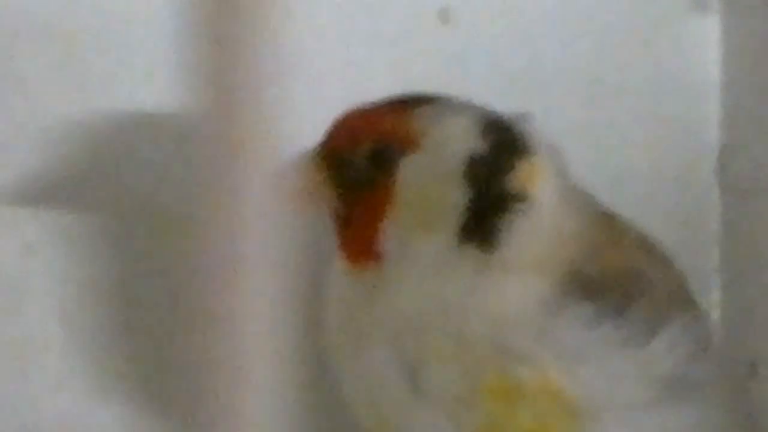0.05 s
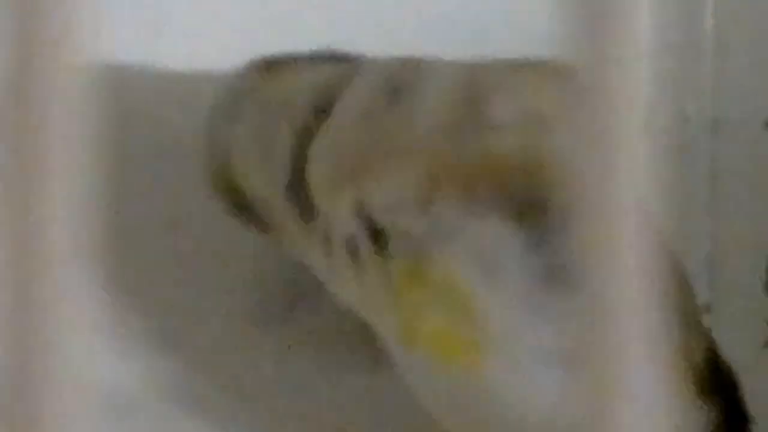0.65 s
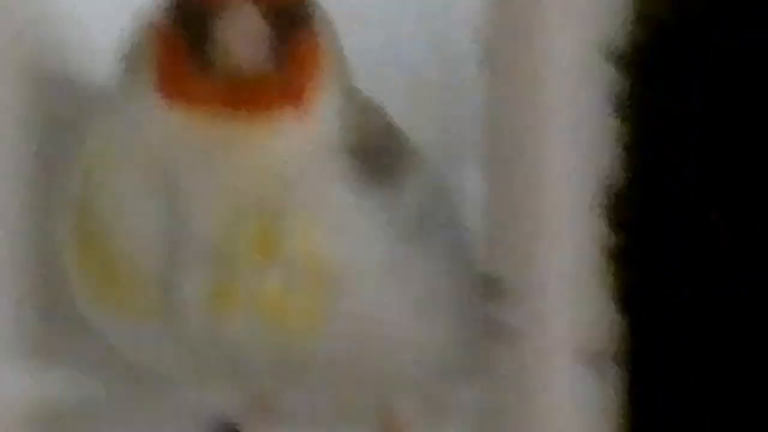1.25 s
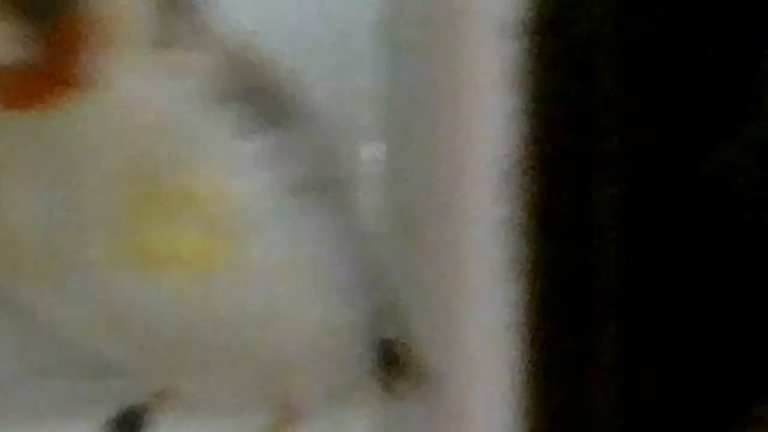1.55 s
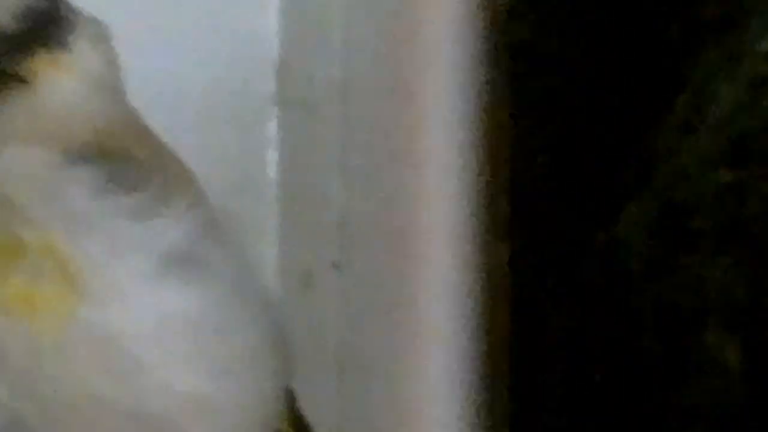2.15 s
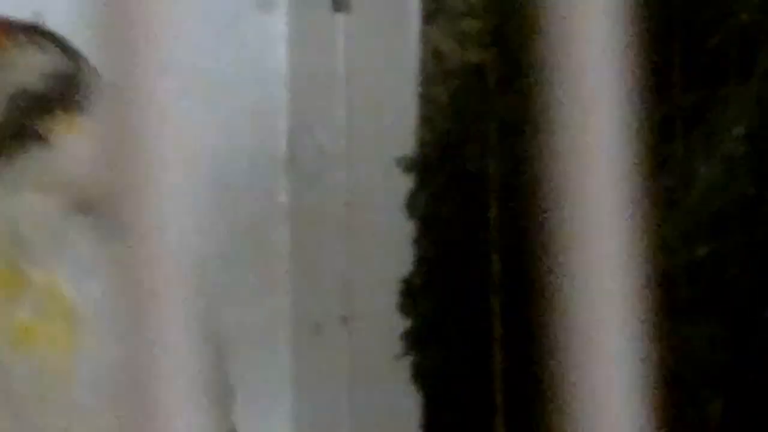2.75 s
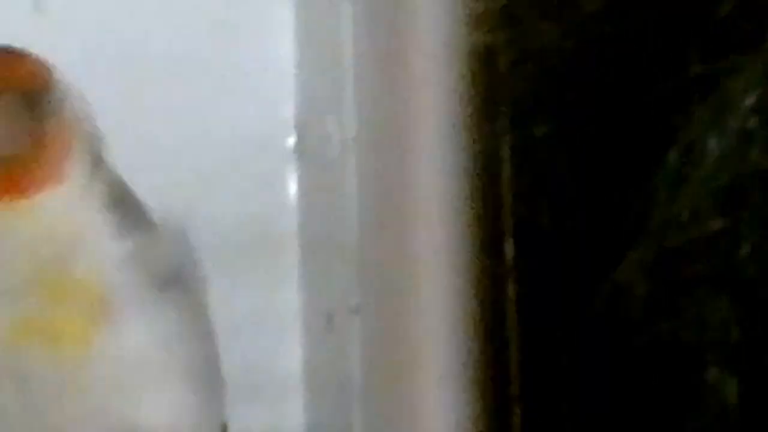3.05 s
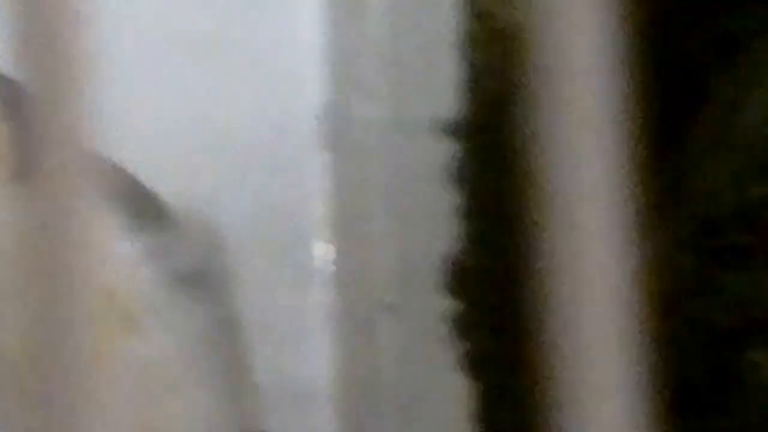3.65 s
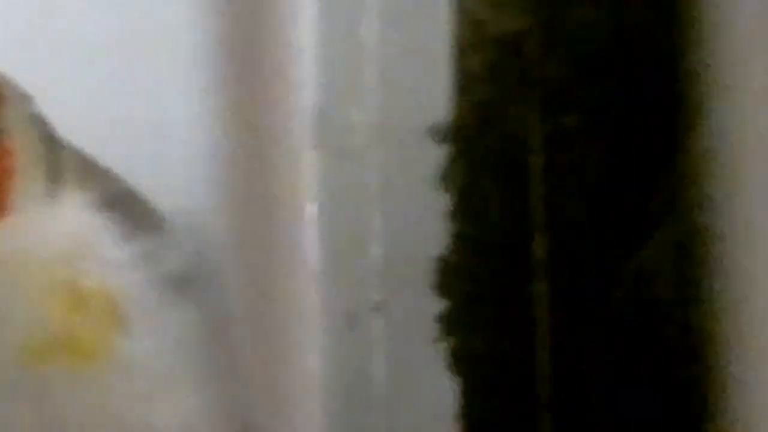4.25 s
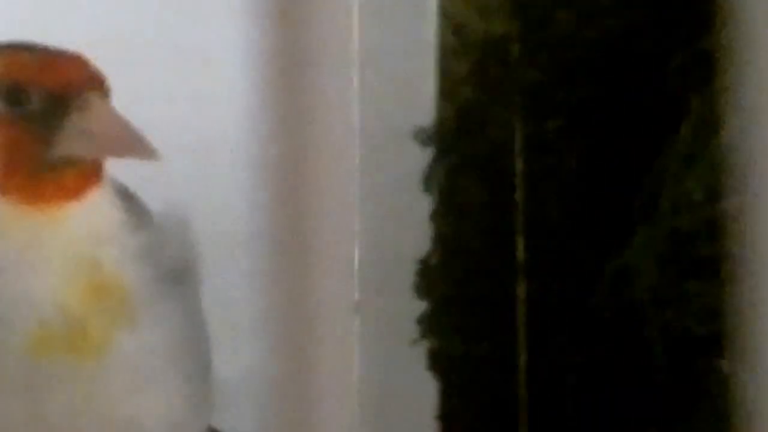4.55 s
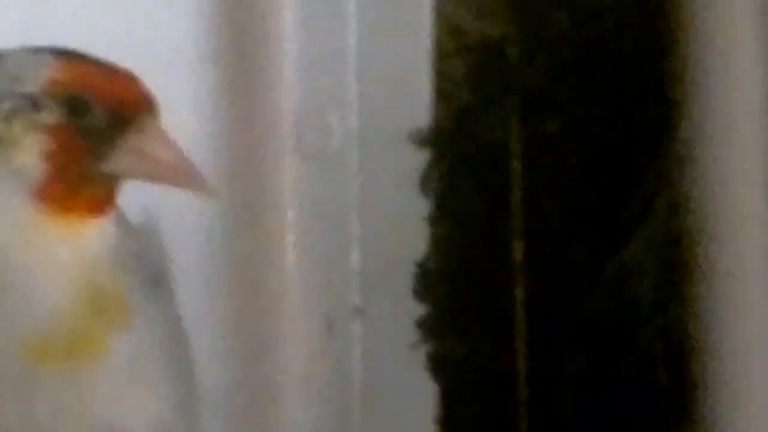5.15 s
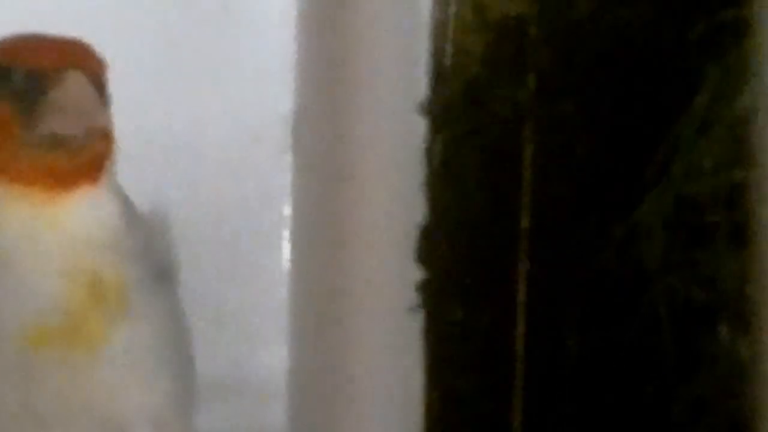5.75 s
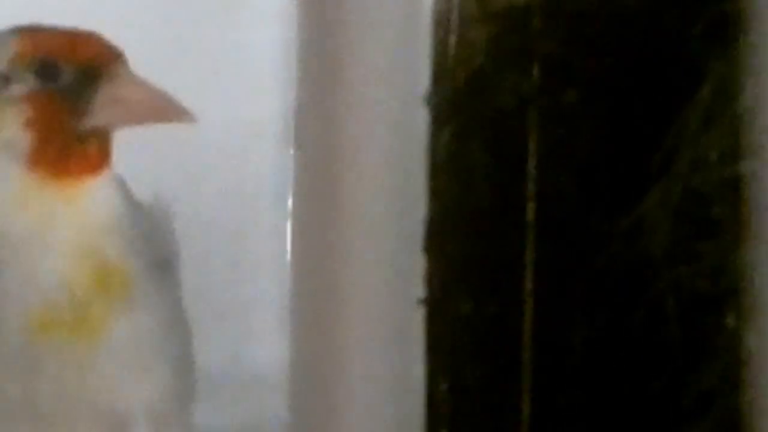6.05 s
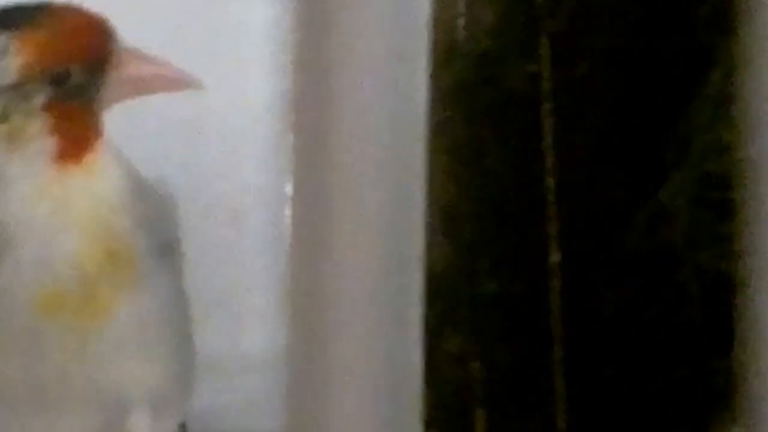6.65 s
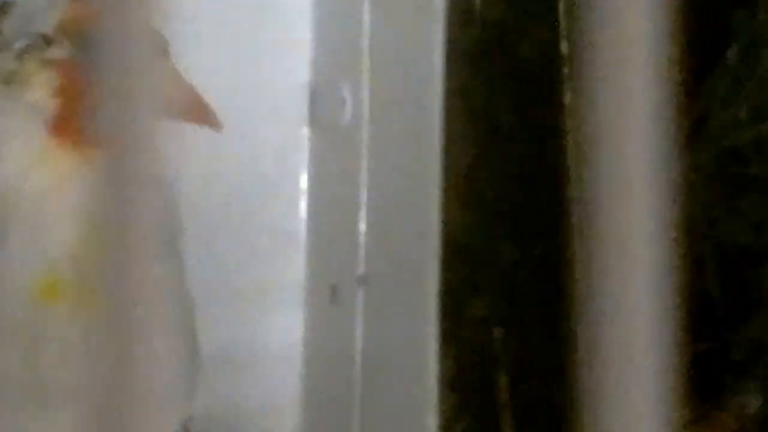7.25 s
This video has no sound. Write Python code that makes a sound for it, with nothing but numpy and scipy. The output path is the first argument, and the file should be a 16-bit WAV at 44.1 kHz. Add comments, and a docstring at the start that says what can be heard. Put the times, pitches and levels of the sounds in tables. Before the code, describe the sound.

In a small room, a motor hums steadily while a caged goldfinch twitters nearby. Its first long phrase mixes thin whistles, rasping notes and a fast trill, with one light knock on the perch. The bird pauses, then gives a shorter, softer phrase among faint cage scuffs and ends on a squeaky chirp. The close notes ring briefly off the hard walls.

```python
"""Caged goldfinch in a small room

A goldfinch twitters near the microphone: buzzed syllables, a trill, even runs of whistles.
Each note is a quick glide of the syrinx, pure or rasping, drawn out by hard walls and cage wires.
A motor hums behind it; the cage knocks once and now and then scuffs faintly. Almost mono."""
import sys
import numpy as np
from scipy import signal
from scipy.fft import rfft, irfft
from scipy.io import wavfile

SR = 44100
rng = np.random.default_rng(int(sys.argv[2]) if len(sys.argv) > 2 else 0)


def to_wav(sig):
    """Store sig (one row per channel, or 1-D mono) as 16-bit WAV at the path in sys.argv[1].

    Samples outside -1..1 are clipped; the rate is SR.
    """
    pcm = np.clip(np.atleast_2d(sig), -1, 1) * 32767
    pcm = np.round(pcm).astype(np.int16)
    wavfile.write(sys.argv[1], SR, pcm.T)  # frames by channels


N = 326340
TIME = np.arange(N) / SR

# falling whistles that stand out of the runs: start_s, length_s, pitch_hz, level_db
ACCENTS = [(0.263, 0.022, 4716, -22), (0.326, .022, 4670, -20), (3.106, 0.019, 4853, -16),
           (3.379, .02, 4740, -23), (6.366, .021, 4550, -22.5), (6.392, .024, 4520, -26)]
# repeats of the trill's four-note figure: start_s, clear_note_hz
TRILL = [(1.627, 3996), (1.815, 4070), (1.994, 4155), (2.184, 4110), (2.368, 4100), (2.556, 4090)]


def amp(db):
    return 10 ** (np.asarray(db) / 20)


def unit(x):
    return x / np.sqrt(np.mean(x ** 2) + 1e-20)


def read(points, hz):
    """Table value at hz, interpolated on a log axis."""
    freq_hz, value = np.transpose(points)
    return np.interp(np.log(hz + 1), np.log(freq_hz + 1), value)


def add(mix, start_s, sound):
    part = mix[max(round(start_s * SR), 0):][:len(sound)]
    part += sound[:len(part)]


def noise(spectrum):
    """Unit-rms noise shaped by rows of freq_hz, gain_db."""
    gain = amp(read(spectrum, np.fft.rfftfreq(N, 1 / SR)))
    return unit(irfft(rfft(rng.standard_normal(N)) * gain, N))


def wander(rate_hz):
    """Unit-rms random curve, low-passed at rate_hz."""
    lowpass = signal.butter(3, rate_hz, fs=SR, output="sos")
    return unit(signal.sosfilt(lowpass, rng.standard_normal(N + SR))[SR:])


def room(x, gap_s=.003, taps_per_s=4000):
    """Dense wall reflections of random sign; the treble dies first."""
    # echo decay: freq_hz, t60_s
    decay = [(200, .35), (3000, .36), (4700, .34), (5800, .28), (6600, .28), (8000, .22), (13000, .18)]
    taps = rng.choice([-1., 1.], SR) * (rng.random(SR) < taps_per_s / SR) * (TIME[:SR] > gap_s)
    hz, t, bands = signal.stft(taps, SR, nperseg=256)
    tail = signal.istft(bands * amp(-60 * t / read(decay, hz)[:, None]), SR, nperseg=256)[1]
    return signal.fftconvolve(x, tail / np.linalg.norm(tail))[:N]


def motor(turn_hz=23.44, drift=.005, waver=.25):
    """Hum at set ratios of a drifting turn rate, mostly whole multiples, each wavering in level."""
    # motor orders: ratio_to_turn_rate, level_db
    orders = [(2, -48.5), (3, -47.5), (4, -52), (5.2, -48), (7, -48.5), (9, -50), (15, -57.5)]
    turn = 2 * np.pi * np.cumsum(turn_hz * (1 + drift * wander(2.6))) / SR
    hum = np.zeros(N)
    for multiple, db in orders:
        peak = amp(db) * np.sqrt(2) * (1 + waver * wander(6.6))
        hum += peak * np.sin(multiple * turn + 2 * np.pi * rng.random())
    return hum


def air(swell_s=2.05, swell_width_s=.37, whirr_half_width_hz=70, floor_db=-41):
    """Rumble and rushing air that swell once, a narrow whirr and a steady noise floor."""
    # noise floor: freq_hz, gain_db
    floor_spectrum = [(20, -20), (32, -21.5), (50, 2), (140, -1), (210, -3), (250, -8), (420, -10),
                      (650, -17), (950, -25), (1400, -20), (1750, -33), (2300, -38.5), (3200, -47.5),
                      (7000, -58.5), (15000, -62.5)]
    # course of the whirr: time_s, level_db, centre_hz
    whirr_track = [(0.7, -51.5, 1372), (2.02, -53, 1390), (7.0, -58, 1322)]
    swell = np.exp(-((TIME - swell_s) / swell_width_s) ** 2)
    rumble = noise([(30, -37), (90, -10), (145, 0), (200, -8), (270, -31.5), (1000, -72)])
    rush = noise([(200, -24), (370, -1.5), (600, -10), (950, -19.5), (1400, -13), (1800, -30.5),
                  (6000, -70)])
    swelling = amp(-47 + 12 * swell) * rumble + amp(-54 + 7.5 * swell) * rush
    time_s, *columns = np.transpose(whirr_track)
    whirr_db, whirr_hz = (np.interp(TIME, time_s, column) for column in columns)
    baseband = wander(whirr_half_width_hz) + 1j * wander(whirr_half_width_hz)
    whirr = unit((baseband * np.exp(2j * np.pi * np.cumsum(whirr_hz) / SR)).real)
    return swelling + amp(whirr_db) * whirr + amp(floor_db) * noise(floor_spectrum)


def stroke(start_s, length_s):
    """Quick rise and slower fall of a contact."""
    u = np.maximum(TIME - start_s, 0) / (length_s / 2)
    return u * np.exp(1 - u)


def knock(level_db=-21, rise_s=.00059):
    """One impact rings the perch."""
    # perch modes: freq_hz, gain_db, t60_s
    modes = [(645, 6.5, 0.014), (1052, -13, 0.031), (1185, -6, 0.033), (2020, -15.5, 0.017)]
    t = TIME[:SR // 4]
    ring = sum(amp(db - 60 * t / t60) * np.sin(2 * np.pi * hz * t) for hz, db, t60 in modes)
    return amp(level_db) * ring * (1 - np.exp(-t / rise_s))


def cage(grain=.19, scuff_fizz_db=-24.5, knock_s=2.594, echo_db=-9):
    """Grainy scuffs with a soft thud, brief high rustles, one knock with a sharp click; their echo."""
    # scuffs on the cage: start_s, length_s, scratch_db, thud_db
    scuffs = [(1.141, 0.019, -43.5, -58), (4.811, 0.015, -54.5, -61), (4.842, .037, -55.5, -58.5),
              (5.16, 0.049, -51.5, -38.5), (5.621, .083, -49, -36), (5.757, 0.03, -47, -48.5),
              (6.715, .016, -54.5, -43), (7.265, 0.034, -47, -33.5)]
    # two brief high rustles, then the sharp click of the knock: start_s, length_s, fizz_db
    fizz_bursts = [(.815, .032, -55), (1.315, 0.037, -55), (2.591, 0.0045, -52)]
    # contact spectra: freq_hz, gain_db
    scratch_spectrum = [(300, -5.5), (1100, 4.5), (2200, 2.5), (4000, -3.5), (7000, -18), (16000, -43.5)]
    thud_spectrum = [(30, -5), (70, -2), (200, -2), (450, -3.5), (800, -14.5), (2000, -46), (16000, -85)]
    fizz_spectrum = [(2000, -45.5), (7000, 3.5), (13000, -5), (16000, -9.5)]
    grains = np.exp(grain * wander(150))
    scratch = unit(noise(scratch_spectrum) * grains)
    thud = noise(thud_spectrum)
    fizz = unit(noise(fizz_spectrum) * grains)
    scratch += amp(scuff_fizz_db) * fizz
    out = np.zeros(N)
    for start_s, length_s, scratch_db, thud_db in scuffs:
        out += stroke(start_s, length_s) * (amp(scratch_db) * scratch + amp(thud_db) * thud)
    for start_s, length_s, fizz_db in fizz_bursts:
        out += stroke(start_s, length_s) * amp(fizz_db) * fizz
    add(out, knock_s, knock())
    return out + amp(echo_db) * room(out)


def wires(x):
    """Thin cage wires ring on after each note."""
    # wire modes: freq_hz, gain_db, t60_s
    modes = [(4090, -9, .25), (4570, -10, .2), (5020, -1, .28), (5230, -4, .28), (5440, -4, .25)]
    t = TIME[:SR // 2]
    ring = np.zeros(len(t))
    for hz, db, t60 in modes:
        resonant_gain = t60 * SR / (2 * np.log(1000))
        ring += amp(db - 60 * t / t60) * np.cos(2 * np.pi * hz * t) / resonant_gain
    return signal.fftconvolve(x, ring)[:N]


def syrinx(notes, glide, rasp, overtone_db, third_db=-14, sag=0, regular=.17, shimmer=.89):
    """Notes (start_s, length_s, pitch_hz, level_db) glide between two pitch ratios; flutter rasps."""
    # radiation of throat and beak: freq_hz, gain_db
    throat = [(2000, 9.5), (3000, 2), (4200, 0), (6700, 5), (7600, -13), (9200, -18), (10500, -13),
              (12800, -13), (14200, -20), (16000, -35.5)]
    flutter_hz, attack_s, release_s = 470, .011, .013
    beat = np.sin(2 * np.pi * np.cumsum(flutter_hz * (1 + .15 * wander(60))) / SR)
    flutter = unit(regular * beat + wander(680))
    throb = np.exp(shimmer * rasp * unit(beat + wander(300)))
    contour = np.polyfit([0, .5, 1], [glide[0], 1, glide[1]], 2)
    out = np.zeros(N)
    for start_s, length_s, pitch_hz, db in notes:
        u = np.linspace(0, 1, int(length_s * SR))
        span = (int(start_s * SR) + np.arange(len(u))) % N
        hz = pitch_hz * np.polyval(contour, u)
        hz *= 1 - sag * (2 * u - 1) ** 10  # low air pressure at both ends
        phase = 2 * np.pi * np.cumsum(hz * (1 + rasp * flutter[span])) / SR
        tone = np.sin(phase)
        for k, partial_db in [(2, overtone_db), (3, overtone_db + third_db)]:
            radiated_db = read(throat, k * hz) - read(throat, hz)
            tone += amp(partial_db + radiated_db) * np.sin(k * phase) * (k * hz < SR / 2)
        ramp = np.minimum(u * length_s / attack_s, (1 - u) * length_s / release_s)
        envelope = np.sin(np.pi / 2 * np.minimum(ramp, 1)) ** 2
        add(out, start_s, amp(db) * unit(tone * envelope * throb[span]))
    return out


def buzz_notes(step_s=.021, buzz_delay_s=.026, tone_s=.044, sideband_hz=470):
    """A thin note steps in pitch, then a harsh buzz settles into a tone; flutter adds a sideband."""
    # syllables: start_s, first_hz, second_hz, thin_db, buzz_s, buzz_hz, buzz_db, tone_hz, tone_db
    syllables = [(.636, 6440, 6400, -28.5, 0.049, 4110, -25, 5030, -30.5),
                 (.848, 6253, 6560, -22, 0.058, 4450, -22, 4550, -25),
                 (1.057, 6540, 6240, -24, 0.054, 4690, -22, 5060, -27.5),
                 (1.251, 6480, 6190, -24, 0.092, 4660, -27, 4580, -24.5),
                 (1.508, 6344, 6250, -25, 0.061, 4285, -29, 4570, -28),
                 (5.288, 6270, 6240, -33, 0.039, 4160, -35.5, 4980, -33.5),
                 (5.484, 6543, 6480, -28.5, .03, 4205, -31.5, 4967, -30.5),
                 (5.668, 6410, 6450, -28.5, .044, 4500, -35, 4930, -36)]
    thin, harsh, tones = [], [], []
    for start_s, first_hz, second_hz, thin_db, buzz_s, buzz_hz, buzz_db, tone_hz, tone_db in syllables:
        thin.append((start_s, .032, first_hz, thin_db))
        thin.append((start_s + step_s, .045, second_hz, thin_db - 2.5))
        harsh.append((start_s + buzz_delay_s, buzz_s, buzz_hz, buzz_db))
        settled_s = start_s + buzz_delay_s + buzz_s / 2
        tones.append((settled_s, tone_s, tone_hz, tone_db))
        tones.append((settled_s, tone_s, tone_hz + sideband_hz, tone_db - 5.5))
    return thin, harsh, tones


def trill_notes(delay_s, length_s, hz, db, step_db, scatter=.008):
    """One note of the trill figure at every repeat, its pitch slightly scattered."""
    return [(start_s + delay_s, length_s, hz * (1 + scatter * rng.standard_normal()), db + k * step_db)
            for k, (start_s, _) in enumerate(TRILL)]


def slur_notes(lead_s=.029, pip_s=.022, pip_hz=3060, clear_s=.036):
    """A low pip, then a clear note: between the buzzes and in the trill."""
    # slurs between buzzes: start_s, pitch_hz, level_db, pip_db
    slurs = [(.779, 4005, -22, -33.5), (0.988, 4063, -20.5, -36), (1.195, 3970, -23.5, -34.5),
             (1.433, 4045, -22.5, -34), (5.413, 4123, -27.5, -53.5), (5.605, 4207, -23.5, -52.5)]
    # trill pip: delay_s, length_s, pitch_hz, level_db, step_db per repeat
    trill_pip = (0, 0.02, 3055, -33, .6)
    # trill clear note: delay_s, length_s, level_db, step_db per repeat
    trill_clear = (.033, 0.0673, -27.5, -0.46)
    low = [(s - lead_s, pip_s, pip_hz, pip_db) for s, _, _, pip_db in slurs] + trill_notes(*trill_pip)
    clear = [(s, clear_s, hz, db) for s, hz, db, _ in slurs]
    delay_s, length_s, level_db, step_db = trill_clear
    clear += [(s + delay_s, length_s, hz, level_db + k * step_db) for k, (s, hz) in enumerate(TRILL)]
    return low, clear


def run_notes(note_s=.033, dip_hz=169.6, scatter_hz=35, fade_db_per_s=12):
    """Evenly paced whistles that dip mid-run and fade, leaving gaps for the accents."""
    # whistle runs: start_s, end_s, period_s, pitch_hz, level_db
    runs = [(0.225, .48, .056, 4790, -25), (3.036, 3.4, .0655, 4815, -21.5),
            (6.014, 6.29, .0615, 4765, -23.5)]
    notes = []
    for start_s, end_s, period_s, pitch_hz, db in runs:
        for t in np.arange(0, end_s - start_s, period_s):
            hz = pitch_hz - dip_hz * np.sin(np.pi * t / (end_s - start_s)) ** 2
            hz += scatter_hz * rng.standard_normal()
            if all(abs(start_s + t - accent[0]) > period_s / 2 for accent in ACCENTS):
                notes.append((start_s + t, note_s, hz, db - fade_db_per_s * t))
    return notes


def squeal_notes(lower_ratio=.839, lower_db=-4):
    """Both sides of the syrinx sound at once, a fixed interval apart."""
    # upper voice: start_s, length_s, pitch_hz, level_db
    upper = [(.234, .024, 5870, -41.5), (0.42, .052, 6610, -27), (.508, 0.073, 5930, -28.5),
             (4.275, .036, 6330, -54), (5.17, 0.0432, 7070, -32), (6.656, .03, 5940, -64.5),
             (6.888, .03, 5230, -67.5), (7.31, 0.039, 6490, -27.5)]
    return upper + [(s, length_s, lower_ratio * hz, db + lower_db) for s, length_s, hz, db in upper]


def finch(beam_hz=7600, echo_db=-1):
    """The song, direct and back from room and wires; falls, flicks and lilts are the driest notes."""
    # quick upward flicks: start_s, length_s, pitch_hz, level_db
    flick_notes = [(1.759, 0.02, 5740, -25), (1.918, 0.024, 6190, -31), (2.141, 0.018, 5750, -28.5),
                   (3.566, 0.023, 5670, -35.5), (4.657, 0.0366, 5720, -41), (7.119, 0.034, 5780, -41),
                   (7.248, 0.028, 5550, -37)]
    # soft, husky low calls: start_s, length_s, pitch_hz, level_db
    chup_notes = [(2.987, .02, 3814, -27), (3.003, 0.0098, 3280, -37), (5.956, 0.043, 3433, -34.5),
                  (6.351, 0.021, 3597, -42.5), (6.456, .036, 2785, -49.5), (6.569, 0.031, 2748, -43.5),
                  (6.715, 0.01, 2020, -45.5), (7.047, 0.043, 3045, -39)]
    # flutter depth by kind of note: share of pitch
    rasp = dict(fall=.004, flick=.008, lilt=.007, run=.004, catch=.018, scoop=.038, buzz=.088, thin=.007, chup=.044, squeal=.014, tone=.0025, pip=.021)
    thin, harsh, tones = buzz_notes()
    low, clear = slur_notes()
    whistles = run_notes()
    catches = [(s, .016, .86 * hz, db - 18) for s, _, hz, db in whistles]  # husky whistle onsets
    # trill notes: delay_s, length_s, pitch_hz, level_db, step_db per repeat
    trill_scoop = (0.084, 0.0461, 5550, -35.5, 0.66)
    trill_tone = (0.1132, 0.05, 5210, -25.5, -1.12)

    falls = syrinx(ACCENTS, (1.025, .96), rasp["fall"], overtone_db=-27, sag=.2)
    flicks = syrinx(flick_notes, (.8, 1.15), rasp["flick"], overtone_db=-3)
    lilts = syrinx(clear, (.96, 1.012), rasp["lilt"], overtone_db=-29, third_db=-7, sag=.1)
    twitter = syrinx(whistles, (1.012, .95), rasp["run"], overtone_db=-30, third_db=-6, sag=.45)
    twitter += syrinx(catches, (.9, 1.08), rasp["catch"], overtone_db=-36)
    twitter += syrinx(trill_notes(*trill_scoop), (.76, 1.04), rasp["scoop"], overtone_db=-25)
    twitter += amp(-1.5) * syrinx(harsh, (.95, 1.05), rasp["buzz"], overtone_db=-13, third_db=-24,
                                  regular=.45, shimmer=1.6)
    twitter += syrinx(thin, (1.01, .98), rasp["thin"], overtone_db=-14)
    twitter += syrinx(chup_notes, (.93, .98), rasp["chup"], overtone_db=-18.5, sag=.15)
    twitter += syrinx(squeal_notes(), (1.05, .97), rasp["squeal"], overtone_db=-6.5)
    twitter += syrinx(trill_notes(*trill_tone), (1.008, .98), rasp["tone"], overtone_db=-24)
    twitter += syrinx(tones, (1.008, .98), rasp["tone"], overtone_db=-15)
    twitter += syrinx(low, (.89, .93), rasp["pip"], overtone_db=-29.5, sag=.18)

    direct = amp(-1) * (falls + flicks + lilts) + amp(-5.5) * twitter
    # the beak beams overtones past the microphone, so they arrive mostly as echo
    direct = signal.sosfilt(signal.butter(6, beam_hz, fs=SR, output="sos"), direct)
    spread = amp(-6) * falls + amp(-2.5) * (flicks + lilts) + twitter
    return direct + amp(echo_db) * room(spread) + wires(spread)


def scene(side_echo_db=-38, hiss_db=-73):
    """Bird, cage, motor and air; only a trace of echo and hiss separates the channels."""
    mono = finch() + cage() + motor() + air()
    side = amp(side_echo_db) * room(mono)
    side += amp(hiss_db) * noise([(100, -6), (1400, -4), (3000, -21), (15000, -29)])
    return np.array([mono + side, mono - side])


def record(dry, open_s=.2293, fade_s=.029, cutoff_hz=15600):
    """The microphone opens after a moment; then the band limit."""
    opened = dry * np.clip((TIME - open_s) / fade_s, 0, 1)
    lowpass = signal.firwin(511, cutoff_hz, window=("kaiser", 9), fs=SR)
    return signal.oaconvolve(opened, lowpass[None], "same")


dry = scene()
out = record(dry)
to_wav(out)
```